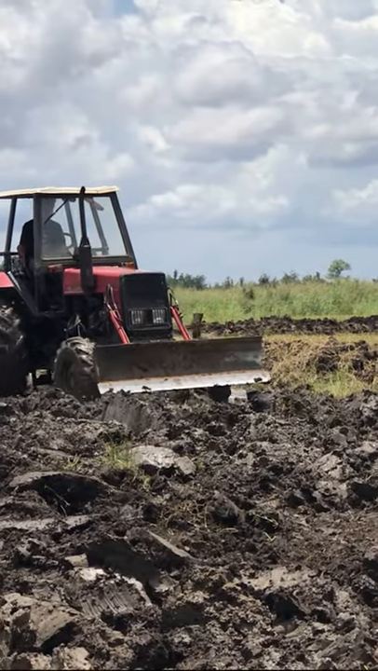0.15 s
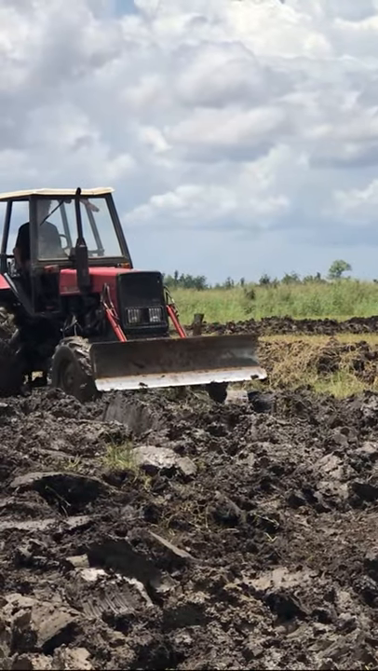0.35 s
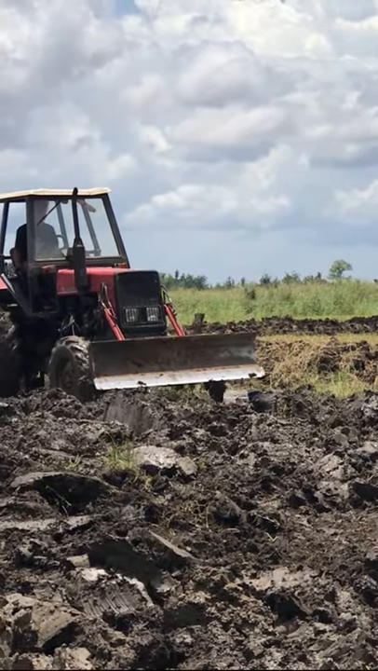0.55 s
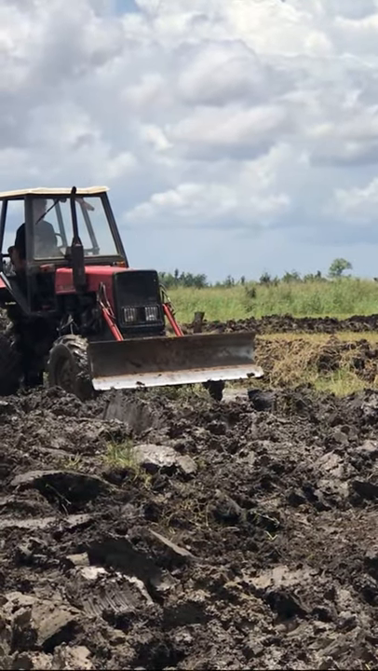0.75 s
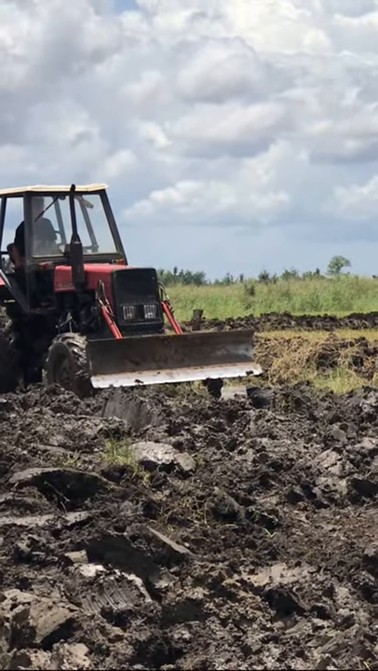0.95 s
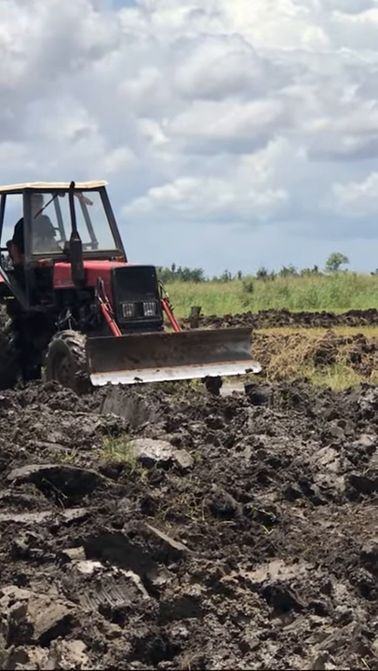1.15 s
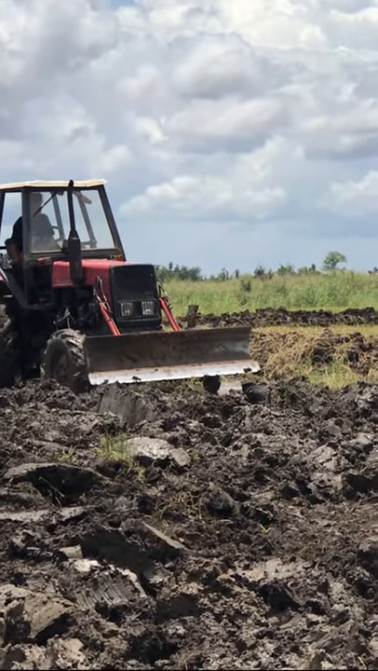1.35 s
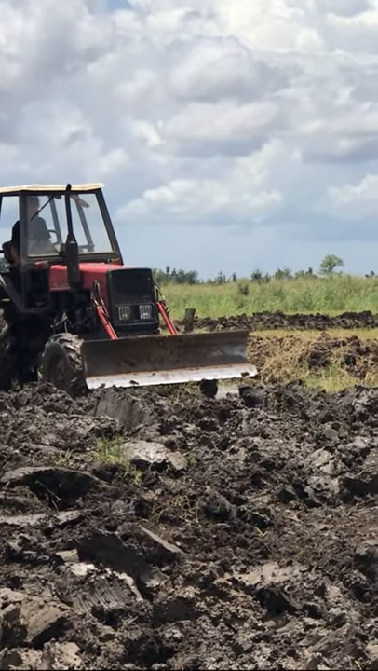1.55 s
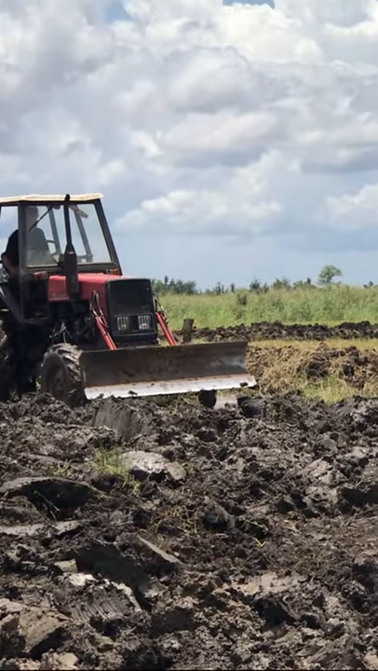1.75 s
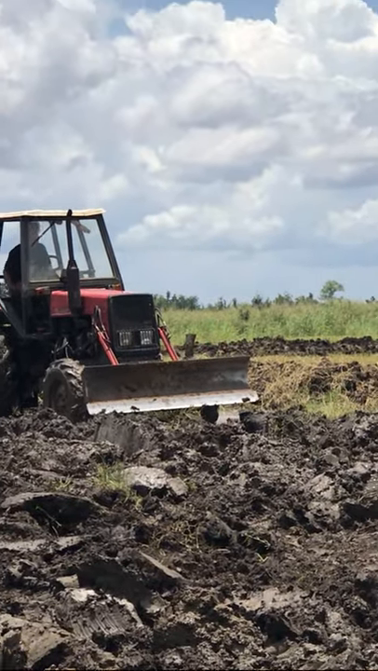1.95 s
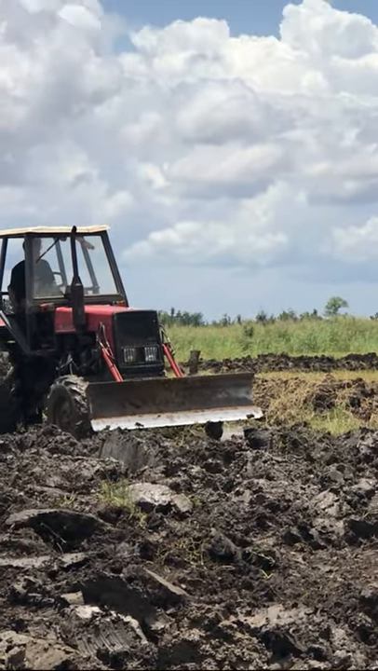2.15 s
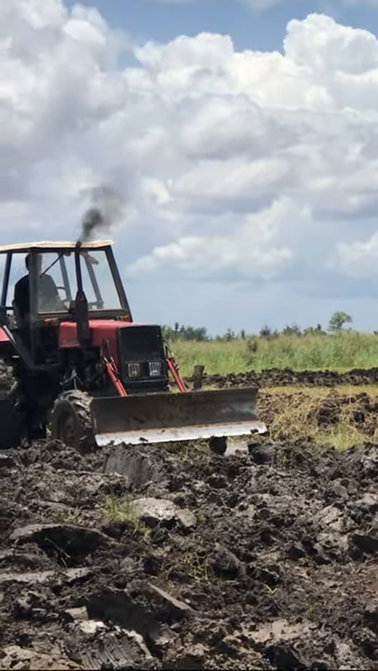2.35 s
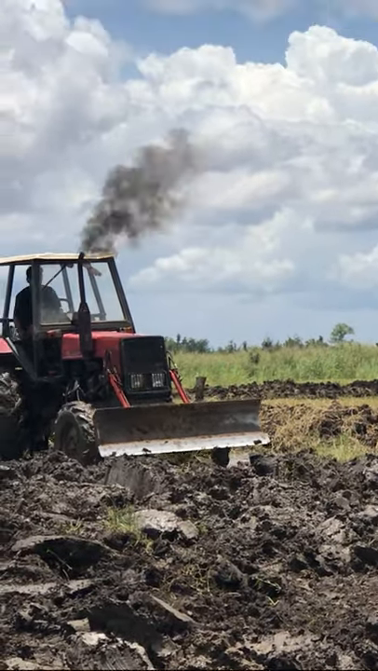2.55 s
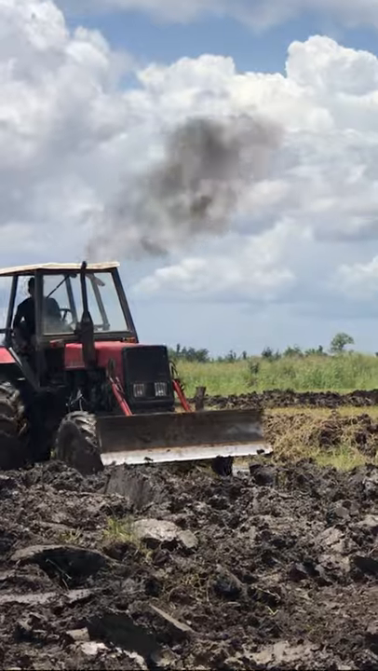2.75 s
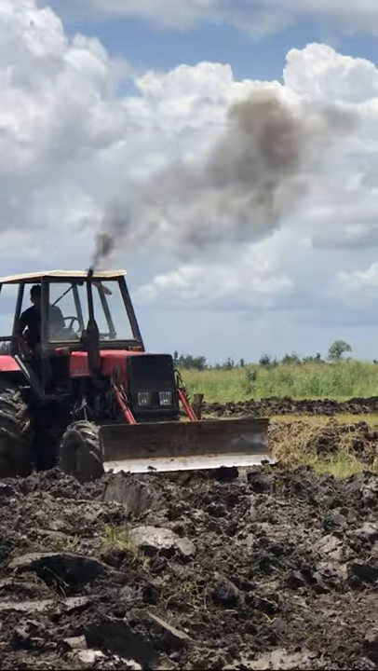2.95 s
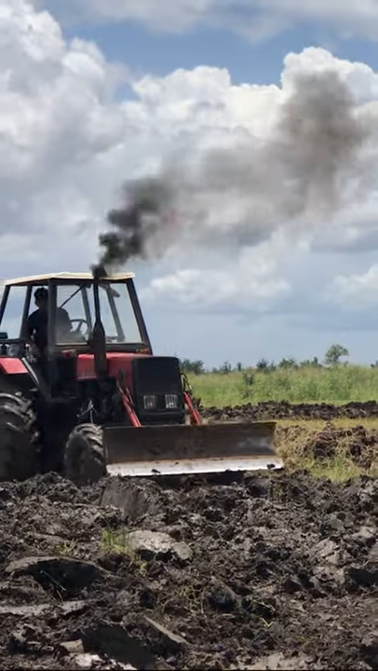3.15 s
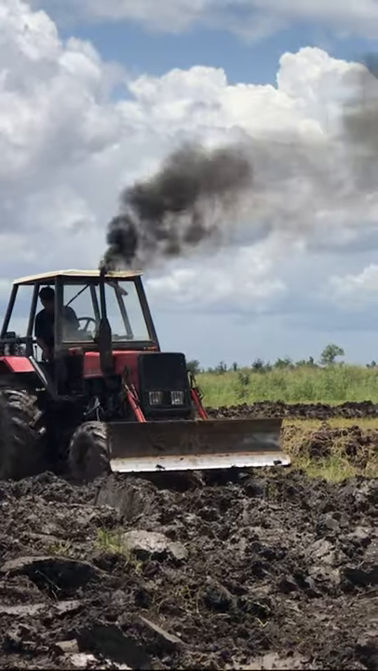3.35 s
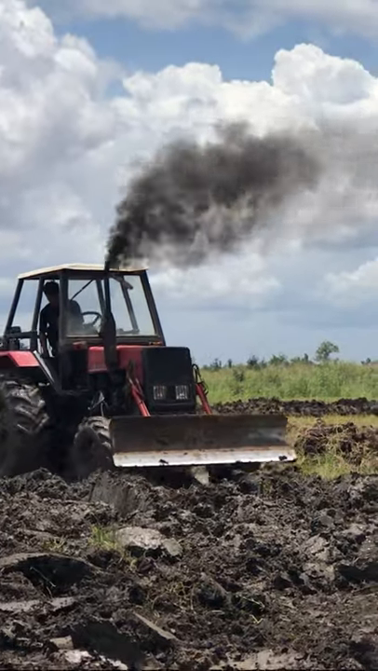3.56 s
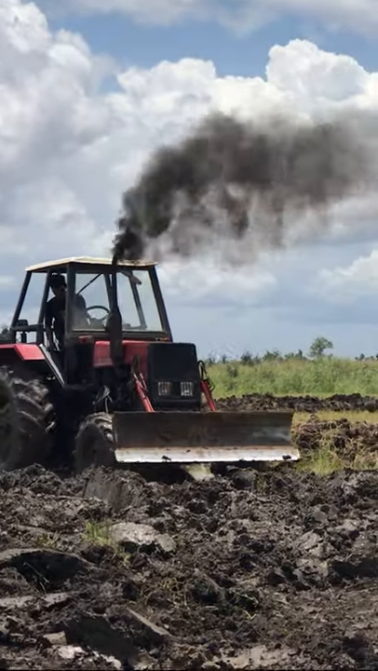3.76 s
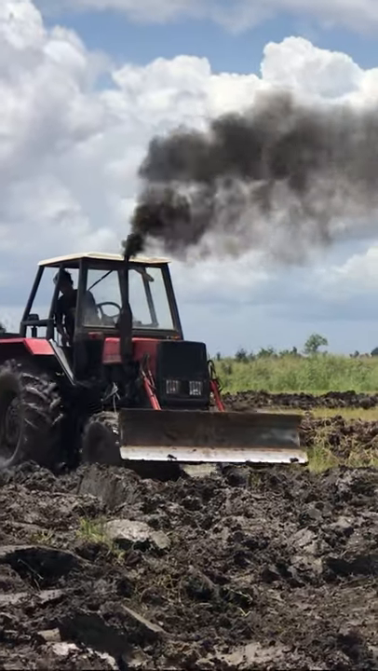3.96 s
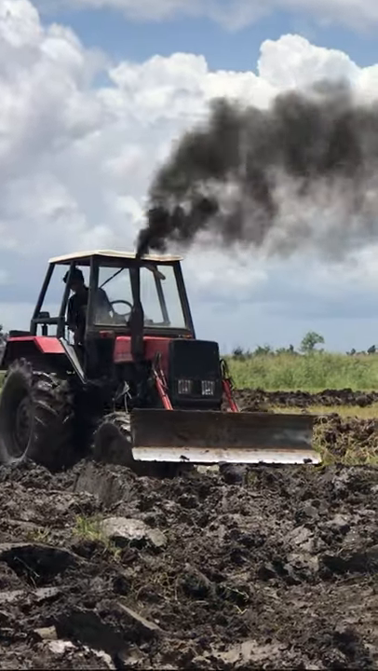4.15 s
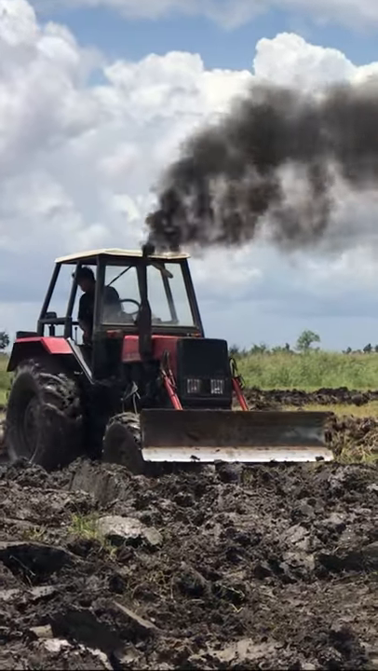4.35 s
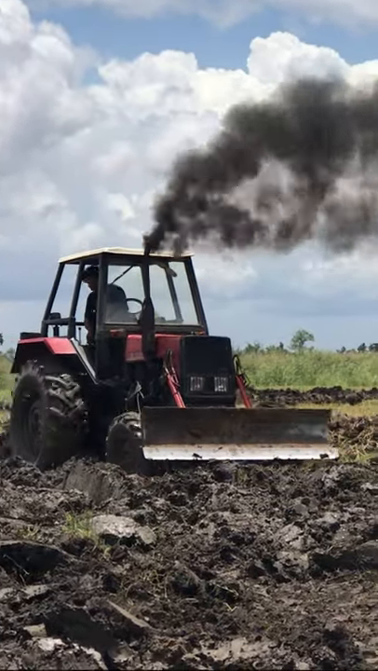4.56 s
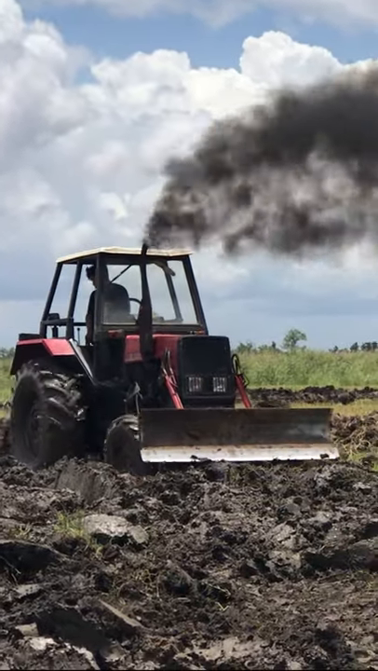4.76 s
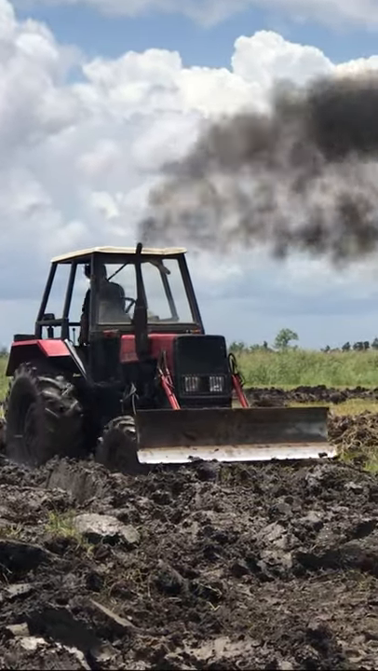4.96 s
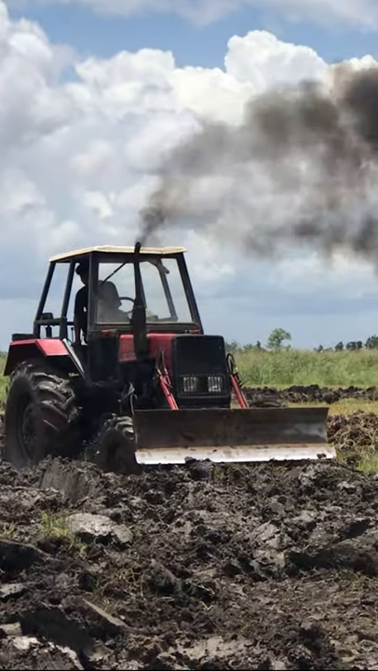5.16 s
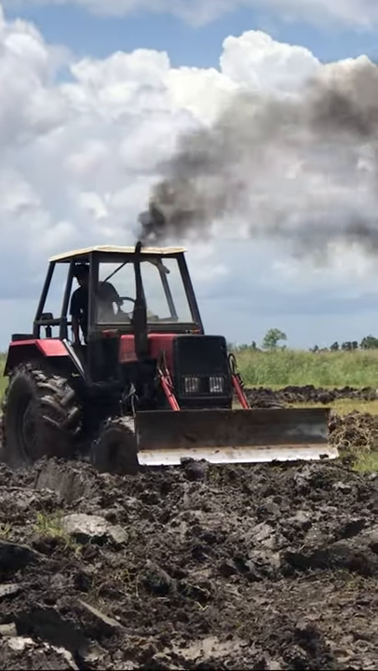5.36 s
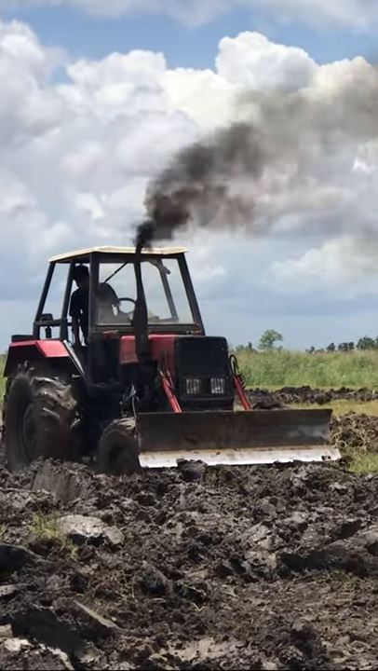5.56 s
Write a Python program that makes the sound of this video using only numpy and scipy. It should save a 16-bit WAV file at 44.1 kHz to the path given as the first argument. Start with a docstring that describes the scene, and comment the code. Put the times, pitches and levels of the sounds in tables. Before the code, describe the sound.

A diesel tractor coasts with soft, uneven chugging and a few pops, then takes load and barks loudly and rapidly in an open field.

```python
"""A four-cylinder diesel tractor in a muddy open field, some metres away.
It coasts with the fuel almost shut, popping now and then; then it takes load and the stack barks hard.
Each firing is a low thump and a puff of turbulent gas that excites the resonances of the exhaust pipe.
Filtered noise and ticks make the engine clatter; low filtered noise makes the rumble beneath.
Under load a leak adds gated noise once each engine cycle."""
import sys
import numpy as np
from scipy import signal
from scipy.fft import rfft, irfft
from scipy.io import wavfile

SR = 44100
rng = np.random.default_rng(int(sys.argv[2]) if len(sys.argv) > 2 else 0)


def generate_wav(sig):
    """Save sig (samples, or channels by samples) to the path in sys.argv[1] as 16-bit PCM at SR."""
    pcm = np.round(np.clip(np.atleast_2d(sig).T, -1, 1) * 32767).astype(np.int16)
    wavfile.write(sys.argv[1], SR, pcm)


N = 246519
TIME = np.arange(N) / SR
LOAD_ON_S = 2.35
SIZE, LEAD = 4096, 700  # samples in one blast, and samples before its peak


def gain_of(db):
    """Logarithmic level: converts decibels to an amplitude factor."""
    return 10 ** (np.asarray(db) / 20)


def evened(x):
    """Normalisation: scales each row to rms 1."""
    return x / np.sqrt(np.mean(x ** 2, axis=-1, keepdims=True) + 1e-20)


def follow(rows, s):
    """Linear interpolation: every column of a curve at the times s."""
    at, *columns = np.transpose(rows)
    return np.array([np.interp(s, at, c) for c in columns])


def read(points, hz):
    """Logarithmic frequency: a spectrum in dB at hz, joined on a log axis."""
    f, db = np.transpose(points)
    return np.interp(np.log(hz + 1), np.log(f), db)


def ring(x, db):
    """Minimum phase: a causal filter of gain db, whose resonances ring after each push, never before."""
    cepstrum = irfft(db * np.log(10) / 20)
    # folding the cepstrum onto positive times makes the response causal
    cepstrum[..., 1:SIZE // 2] *= 2
    cepstrum[..., SIZE // 2 + 1:] = 0
    return irfft(rfft(x) * np.exp(rfft(cepstrum)))


def resonance_db(peaks, hz):
    """Resonance: the power gain in dB of Lorentzian peaks above a flat base."""
    raised = sum((gain_of(db) ** 2 - 1) / (1 + (2 * (hz - f) / width) ** 2) for f, width, db in peaks)
    return 10 * np.log10(1 + raised.clip(0))


def coloured(x, points, peaks=()):
    """Spectral shaping: gives a long sound a broad spectrum and resonances, at rms 1."""
    hz = np.fft.rfftfreq(N, 1 / SR)
    db = read(points, hz) + (resonance_db(peaks, hz) if len(peaks) else 0)
    return evened(irfft(rfft(x) * gain_of(db), N))


# engine speed, which wavers and sags while coasting and climbs under load: t/s, firing rate f/Hz
ENGINE_SPEED = [(0, 40.51), (.76, 30.57), (.94, 24.52), (1.02, 35.21), (1.52, 24.6), (1.68, 32.8),
                (1.85, 29.07), (2.31, 28.48), (2.64, 47.08), (3.11, 40.21), (3.75, 44.37), (4.2, 44.98),
                (4.52, 49.6), (4.93, 54.19), (5.17, 53.41), (5.59, 47.45)]


def engine_speed(s):
    """Firing rate: firings per second at the times s."""
    return follow(ENGINE_SPEED, s)[0]


def speed_db():
    """Speed as a level: dB relative to its mean."""
    speed = engine_speed(TIME)
    return 20 * np.log10(speed / speed.mean())


def firing_count():
    """Phase as integrated frequency: a smooth count of firings that starts near -0.1."""
    return np.cumsum(engine_speed(TIME)) / SR - 0.1


# strength of each cylinder in firing order: level/dB
CYLINDER_STRENGTH = [0.35, -0.39, -1.85, -1.06]


def firings():
    """Periodic excitation: times of the firings and the strength in dB of the cylinder of each."""
    at = np.flatnonzero(np.diff(np.floor(firing_count())) > 0)
    return at / SR, np.resize(CYLINDER_STRENGTH, len(at))


def burst(t, rise, fall, crest=1.0):
    """Valve flow: swells as the valve opens, rounds off, and dies as the cylinder empties."""
    return np.exp(crest - np.hypot(np.minimum(t / rise, -t / fall), crest))


# broad spectrum of the gas rush: f/Hz, relative level/dB
BARK_SPECTRUM = [(150, -24), (330, -25.5), (550, -17), (800, -10), (1000, -5.5), (1400, -2.5), (1800, 0.5),
                 (2250, -4.5), (3300, -7), (4200, -11), (5000, -18.5), (8000, -32.5), (16000, -22)]
# broad spectrum of the jet, also of the fine sizzle: f/Hz, relative level/dB
HISS_SPECTRUM = [(1000, -67.5), (3000, 13.5), (5500, 2), (7000, 6), (7700, 1), (9500, 5), (10400, -2),
                 (11200, 0.5), (13000, -1), (16000, -10)]
# spectrum of the air pushed by a blast: f/Hz, relative level/dB
THUMP_SPECTRUM = [(15, -61), (30, -3), (42, -2.5), (55, 3.5), (72, 6.5), (88, 2), (105, 3), (130, -7),
                  (175, -12), (230, -23.5), (320, -39), (600, -31.5), (2000, -95)]


def exhaust(s, bark_db, hiss_db, thump_db, peaks, heat=1, rise=0.0032, fall=0.0029, crack=0.15,
            heat_spread=0.0019, hiss_early=0.0018, thump_early=0.0021, tilt_spread_db=0.5,
            damping=0.29):
    """Source and resonator: each firing's gas rush and crack ring the stack, a jet hisses, the air thumps.

    Times are in seconds; tilt is in dB per octave well above 1 kHz."""
    length_spread, mode_spread_db = 0.14, 3.0
    t, hz = (np.arange(SIZE) - LEAD) / SR, np.fft.rfftfreq(SIZE, 1 / SR)
    warm, length, snap, offset, tilt = rng.standard_normal((len(s), 5)).T[:, :, None]
    rush, jet = rng.standard_normal((2, len(s), SIZE))
    speed = engine_speed(s)[:, None]

    # each blast favours other resonances, and fast gas damps them all
    favour = rng.standard_normal((len(s), len(peaks))).T[:, :, None]
    excited = [(f, width, db + mode_spread_db * lift) for (f, width, db), lift in zip(peaks, favour)]
    pitch = heat * (1 + heat_spread * warm)
    stack_db = resonance_db(excited, hz / pitch) * (speed.mean() / speed) ** damping

    stretch = np.exp(length_spread * length)
    flow = rush * burst(t, rise * stretch, fall * stretch)
    flow /= np.linalg.norm(flow, axis=1, keepdims=True)
    flow[:, LEAD] += crack * np.exp(0.17 * snap[:, 0])

    # some blasts come out dull, others bright
    tilt_db = tilt_spread_db * tilt * np.log2(1 + hz / 1000)
    bark = ring(flow, read(BARK_SPECTRUM, hz) + stack_db + tilt_db)
    jet_flow = jet * burst(t + hiss_early + 0.00078 * offset, 0.0023 * stretch, 0.0022)
    hiss = ring(jet_flow, read(HISS_SPECTRUM, hz) + stack_db)
    push = np.exp(-((t + thump_early) / 0.000095) ** 2)
    thump = ring(push, read(THUMP_SPECTRUM, hz))

    parts = ((bark_db, bark), (hiss_db, hiss), (thump_db, thump))
    blasts = sum(gain_of(db)[:, None] * evened(part) for db, part in parts)
    # each level is the rms over one firing period
    blasts = blasts * np.sqrt(SR / speed / SIZE)
    out = np.zeros(N + 2 * SIZE)
    for at, blast in zip(np.round(s * SR).astype(int), blasts):
        out[at:at + SIZE] += blast
    return out[LEAD:LEAD + N]


# nominal resonances of the cool stack: f/Hz, width f/Hz, level above the broad spectrum/dB
COOL_RESONANCES = [(406, 9.7, 11.5), (657.5, 33, 15.5), (970, 58, 15.5), (1240, 170, 16.5), (1593, 21, 13),
                   (2730, 260, 7), (3340, 130, 4.5), (5350, 130, 5), (6500, 240, 2), (6900, 140, 2)]


def coasting(jitter=0.0005, bark_db=-36.0, hiss_db=-56.5, thump_db=-45.0, bark_spread_db=1.3,
             thump_spread_db=5.5, growth=2.6, fade_db_per_s=3.5):
    """Weak excitation: with little fuel the firings are soft and uneven, and weaker as the engine slows.

    Bark and hiss are set at mean speed and time 0; growth is in dB per dB of speed, jitter in s."""
    s, cylinder_db = firings()
    s, cylinder_db = s[s < LOAD_ON_S], cylinder_db[s < LOAD_ON_S]
    late, burn, push = rng.standard_normal((len(s), 3)).T
    # the fuel runs down with time
    effort = growth * np.interp(s, TIME, speed_db()) - fade_db_per_s * s
    level = effort + cylinder_db + bark_spread_db * burn
    puffs = exhaust(abs(s + jitter * late), level + bark_db, level + hiss_db,
                    thump_db + thump_spread_db * push, COOL_RESONANCES,
                    rise=0.0035, fall=0.0055, crack=0.083, heat_spread=0.0037)
    # slow gas makes little treble
    return signal.sosfilt(signal.butter(3, 1750, fs=SR, output="sos"), puffs)


def field(x, echo_db=-17, t60=0.014):
    """Scattering: clods and bodywork return a short, faint tail of sparse echoes (t60 in s)."""
    t = np.arange(SR // 5) / SR
    signs = rng.choice([-1., 1.], len(t))
    sparse = rng.random(len(t)) < 3000 / SR  # 3000 echoes per second
    taps = signs * sparse * (t > 0.004) * gain_of(-60 * t / t60)
    scattered = signal.sosfilt(signal.butter(2, 500, "high", fs=SR, output="sos"), x)
    return x + gain_of(echo_db) * signal.oaconvolve(scattered, taps / np.linalg.norm(taps))[:N]


# broad spectrum of the clatter: f/Hz, relative level/dB
CLATTER_SPECTRUM = [(200, -0.5), (500, -14.5), (650, -4), (1250, -9.5), (2000, -0.5), (3000, -8),
                    (4200, -7.5), (5300, -17.5), (6500, -17), (7600, -19), (9000, -15), (16000, -24.5)]


def clatter(level_db=-41.5, growth=1.0, throb=0.19, ticks_per_s=500, tick_share=0.37,
            sizzle_db=-50, sizzle_hold_s=0.43, sizzle_fade_db_per_s=10.5, sizzle_growth=0.6):
    """Modulated noise: fan rush and valve and injector ticks grow with speed; a fine sizzle fades out.

    Levels are at mean speed; growth is in dB per dB of speed."""
    ticks = rng.standard_normal(N) * (rng.random(N) < ticks_per_s / SR)
    rattle = rng.standard_normal(300) * np.exp(-np.arange(300) / SR / 0.001)
    rattling = evened(signal.oaconvolve(ticks, rattle)[:N])
    drive = rng.standard_normal((2, N)) + tick_share * rattling
    # one throb per firing
    drive *= 1 + throb * np.cos(2 * np.pi * (firing_count() - 0.15))
    body = coloured(drive[0], CLATTER_SPECTRUM, COOL_RESONANCES) * gain_of(level_db + growth * speed_db())
    fade_db = sizzle_fade_db_per_s * np.maximum(TIME - sizzle_hold_s, 0)
    sizzle_level_db = sizzle_db + sizzle_growth * speed_db() - fade_db
    return body + coloured(drive[1], HISS_SPECTRUM) * gain_of(sizzle_level_db)


# broad spectrum of the shaking block: f/Hz, relative level/dB
BLOCK_SPECTRUM = [(15, -57), (35, -0.5), (55, -3), (90, 3.5), (130, -11), (200, -10.5), (260, -16),
                  (330, -31.5), (600, -61), (2000, -79)]
# drumming of the body panels: f/Hz, relative level/dB
PANEL_SPECTRUM = [(70, -24), (140, 3.5), (210, -0.5), (260, -8), (330, -30.5), (400, -14), (480, -21),
                  (1000, -29)]


def rumble(level_db=-40.0, drum_db=-45.0, drum_growth=3.4):
    """Structural radiation: the block shakes unevenly; body panels drum more as speed rises (dB per dB)."""
    block, panels = rng.standard_normal((2, N))
    shaking = coloured(block, BLOCK_SPECTRUM) * gain_of(level_db)
    drumming = coloured(panels, PANEL_SPECTRUM) * gain_of(drum_db + drum_growth * speed_db())
    return shaking + drumming


# lone firings that catch fuel while coasting: t/s, bark level/dB, hiss level/dB, thump level/dB
LONE_FIRINGS = [(.981, -38, -62, -41), (1.017, -32, -44, -32), (1.045, -40.5, -64, -30),
                (1.554, -39, -49.5, -38), (1.658, -41, -47.5, -35), (1.691, -46, -56, -39),
                (2.126, -36.5, -43.5, -36), (2.268, -39.5, -52.5, -29.5)]


def popping(crack=0.084):
    """Impulsive excitation: a single cylinder catches fuel and barks through the cool stack."""
    return exhaust(*np.transpose(LONE_FIRINGS), COOL_RESONANCES, rise=0.0028, fall=0.0028,
                   crack=crack, tilt_spread_db=5.0)


# the governor cuts the fuel as the speed falls back from an overshoot: start t/s, length t/s, level/dB
GOVERNOR_CUTS = [(2.72, .045, -9), (2.786, 0.04, -5.5)]


def fuel_cut_db(s):
    """Reduced excitation: the drop in level at the times s while the fuel is held back."""
    return sum(db * ((s > start) & (s < start + length)) for start, length, db in GOVERNOR_CUTS)


# nominal effort under load, also of the leak: t/s, bark level/dB, hiss level before its lift/dB
LOAD_EFFORT = [(2.36, -26.5, -43.5), (2.7, -27, -42.5), (2.88, -28, -41), (3.3, -29, -40),
               (3.9, -27, -39.5), (4.35, -26.5, -42), (4.8, -25.5, -37), (5.2, -28, -39.5),
               (5.59, -28, -42)]
# firings that burn harder than their neighbours: t/s, extra bark level/dB
STRONG_FIRINGS = [(2.426, 0.5), (2.775, 2), (2.842, 3), (2.98, 1.5), (3.078, 2), (3.831, 2), (3.942, 1),
                  (4.168, 1)]
MAIN_WIDTH_HZ = 62  # width of the strongest hot resonance
# nominal resonances of the hot stack: f/Hz, width f/Hz, level above the broad spectrum/dB
HOT_RESONANCES = [(386, 23, 19), (740.5, 48, 15.7), (1113, MAIN_WIDTH_HZ, 20.4), (1415, 106, 13.95),
                  (1760, 80, 7.7), (2615, 170, 7.4), (3254, 123, 5.9), (3920, 280, 3.5), (5360, 250, 4.9),
                  (6060, 44, 1), (6060, 720, 3.1), (6980, 140, 3.2), (8460, 210, 2), (11200, 350, 0.83)]


def pulling(jitter=0.0002, bark_spread_db=0.33, hiss_spread_db=2.0, thump_spread_db=0.15,
            hiss_lift_db=3.0, hiss_cut_share=0.96, thump_cut_share=0.38):
    """Sound speed rises with temperature: hard, regular firings ring a stack that warms and rises in pitch."""
    s, cylinder_db = firings()
    s, cylinder_db = s[s > LOAD_ON_S], cylinder_db[s > LOAD_ON_S]
    late, burn, spray, push = rng.standard_normal((len(s), 4)).T
    bark, hiss = follow(LOAD_EFFORT, s)
    for at, extra_db in STRONG_FIRINGS:
        bark[np.argmin(abs(s - at))] += extra_db
    cut = fuel_cut_db(s)

    # the thump swells with speed (dB per dB) up to the rate where the cylinders fill fully
    full_thump_db, full_speed_hz, thump_growth = -23.5, 44.5, 3
    filling_db = np.minimum(20 * np.log10(engine_speed(s) / full_speed_hz), 0)
    thump = full_thump_db + thump_growth * filling_db

    # factor on the pitch of the resonances: as the load comes on, and once warm
    heat_start, heat_warm, warming_s = 0.98, 1.005, 0.71
    heat = heat_warm + (heat_start - heat_warm) * np.exp((LOAD_ON_S - s) / warming_s)

    bark = bark + cut + cylinder_db + bark_spread_db * burn
    hiss = hiss + hiss_cut_share * cut + hiss_lift_db + hiss_spread_db * spray
    thump = thump + thump_cut_share * cut + cylinder_db / 2 + thump_spread_db * push
    return exhaust(s + jitter * late, bark, hiss, thump, HOT_RESONANCES, heat=heat[:, None])


def once_every(firings_apart, place, width):
    """Periodic gating: a soft gate opens at one place of the engine cycle; all three count firings."""
    away = (firing_count() - place + firings_apart / 2) % firings_apart - firings_apart / 2
    return np.exp(-(away / width) ** 2)


# fizz of the leak: f/Hz, relative level/dB
LEAK_SPECTRUM = [(3000, 6), (6000, -1), (8000, -8), (10000, -1.5), (12500, 1.5), (16000, -2.5)]


def leak(level_db=-4.0, width=0.18):
    """Jet noise: a leak, probably at a gasket, fizzes once each engine cycle just before its blast.

    The level is relative to the hiss column of the load effort; width is in firings."""
    gate = once_every(len(CYLINDER_STRENGTH), 1.76, width)
    effort_db = follow(LOAD_EFFORT, TIME)[1] + fuel_cut_db(TIME)
    level = gain_of(effort_db + level_db) * (TIME > LOAD_ON_S)
    return coloured(rng.standard_normal(N), LEAK_SPECTRUM) * evened(gate) * level


def scene():
    """Superposition: the stack and leak with their scattered tail, and the engine body, in the open."""
    stack = coasting() + popping() + pulling()
    return (field(stack + leak()) + clatter() + rumble())[None]


def record(dry, low_cut_hz=27, edge_hz=15790):
    """Band limitation: the microphone loses the deepest bass; a steep filter then limits the treble."""
    heard = signal.sosfilt(signal.butter(2, low_cut_hz, "high", fs=SR, output="sos"), dry)
    low_pass = signal.firwin(2047, edge_hz, window=("kaiser", 9), fs=SR)
    return signal.oaconvolve(heard, low_pass[None], "same")


dry = scene()
out = record(dry)
generate_wav(out)
```